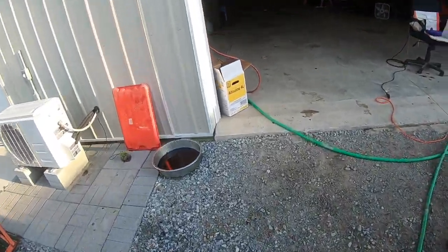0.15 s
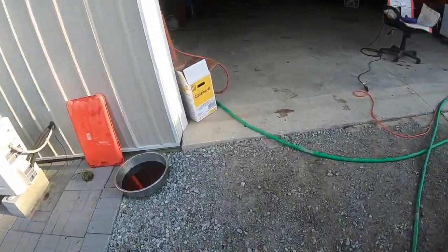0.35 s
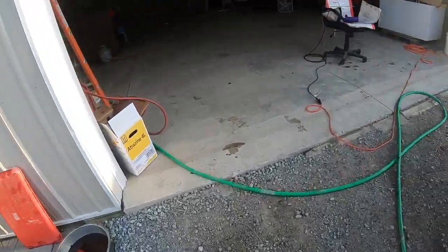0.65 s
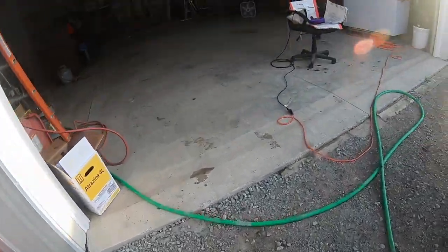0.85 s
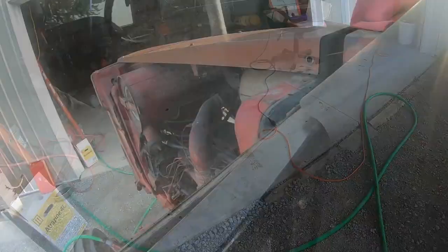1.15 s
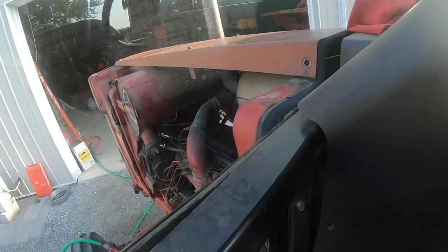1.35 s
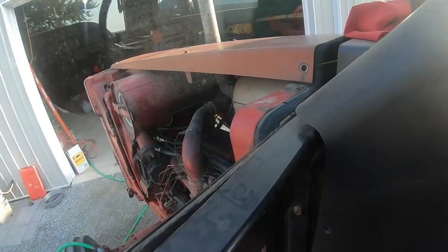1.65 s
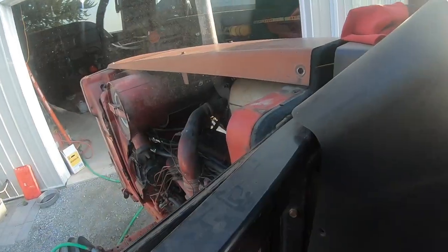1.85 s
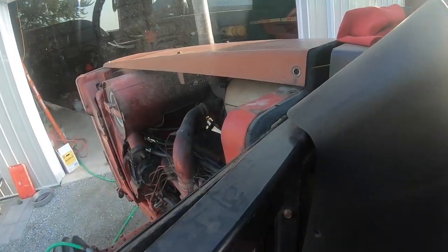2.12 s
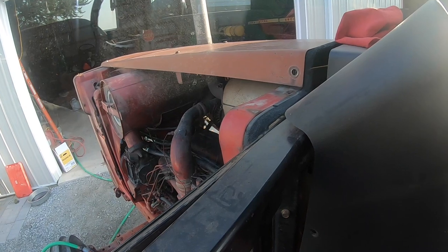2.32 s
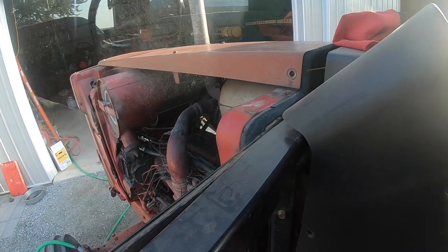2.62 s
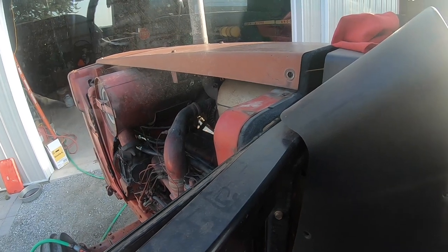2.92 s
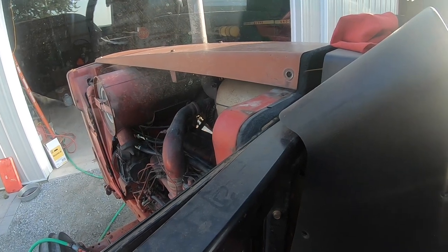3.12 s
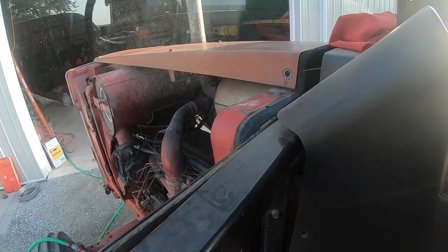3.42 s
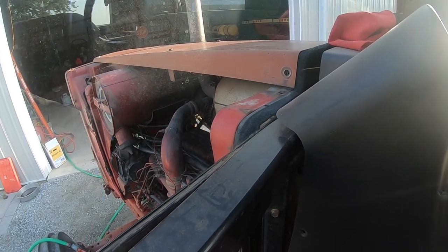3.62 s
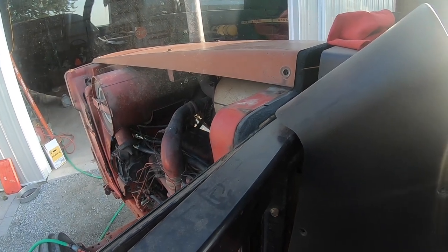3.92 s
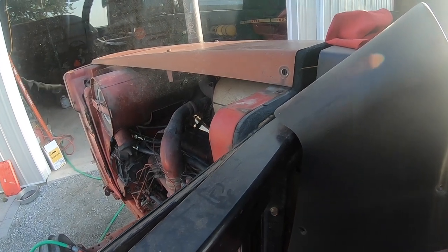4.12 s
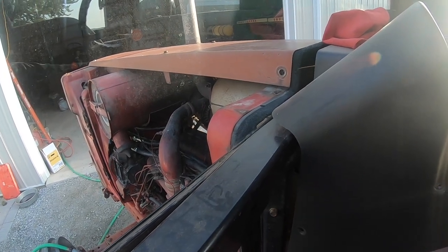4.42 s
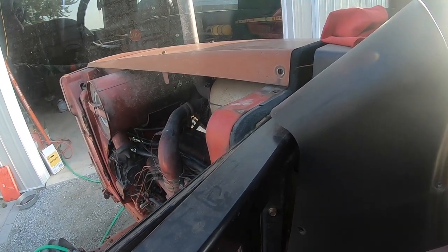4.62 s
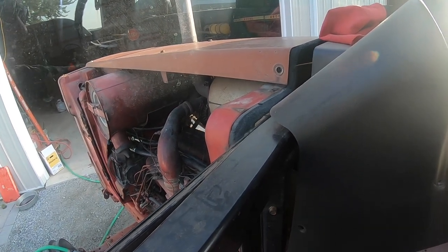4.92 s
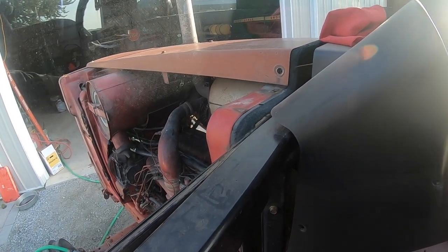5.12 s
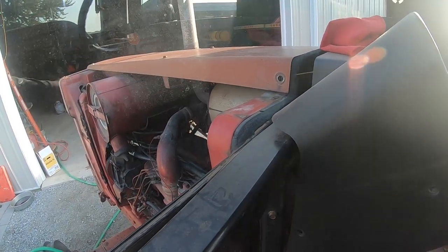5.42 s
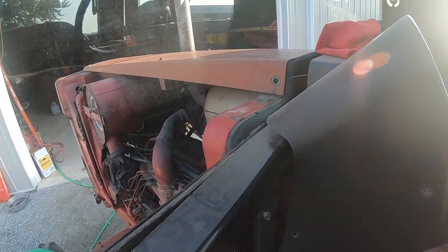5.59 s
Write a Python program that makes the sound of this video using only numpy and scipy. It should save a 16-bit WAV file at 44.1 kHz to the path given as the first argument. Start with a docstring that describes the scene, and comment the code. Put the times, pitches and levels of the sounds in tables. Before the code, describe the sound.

Heard through a small stereo microphone: brief footsteps on loose gravel with low handling thumps, fading into the near-quiet of a tractor cab. A sharp knock, hollow taps and small trim creaks follow over a thin fan hiss. A heavy starter clunk and grinding crank then break in, wide and rattly, before the diesel fires and runs in a low, centred, uneven idle that rises a little.

```python
"""Footsteps crunch on gravel in a yard, which dissolves into the cab of a six-cylinder diesel tractor.
The cab knocks and creaks, the starter clunks in and cranks, the engine catches and idles, and the
idle speed lifts a little near the end. Noise and random clicks are filtered into air, gravel, trim,
gear teeth and engine body; fading sine waves make stones, bumps and hollow knocks. A running count
of firings paces the engine. A small microphone with two openings (ports) hears it all in stereo."""
import sys
import numpy as np
from scipy import signal
from scipy.io import wavfile
from scipy.ndimage import uniform_filter1d

SR = 44100
rng = np.random.default_rng(int(sys.argv[2]) if len(sys.argv) > 2 else 0)


def persist_wave(psi):
    """Save psi, clipped to +-1, as 16-bit WAV."""
    counts = np.round(np.clip(psi, -1, 1) * 32767).astype(np.int16)
    wavfile.write(sys.argv[1], SR, np.atleast_2d(counts).T)


N = 253575  # length in samples

# In spectrum tables, level/dB is the density per Hz; only the shape counts where the result is evened.
# hiss of the cab fan, also used to colour the chirps: [f/Hz, level/dB]
FAN_SPECTRUM = [(1650, -49), (2800, -12), (3330, -9), (3380, -2), (3540, 6.5), (5000, 5.5), (5680, 4),
                (6190, -3), (6850, -18), (8900, -36), (15100, -120)]
DISSOLVE_S = (0.83, 1.246)  # the yard air sinks while the cab fan fades in
CAB_S = (1, 2.565)  # span of the cab's own sounds


def amp(db):
    """Turn decibels into a plain gain."""
    return 10 ** (np.asarray(db) / 20)


def evened(x):
    """Scale a sound to rms 1."""
    return x / np.sqrt(np.mean(x ** 2) + 1e-20)


def curves(rows):
    """Columns of a table, joined by straight lines over the whole length."""
    s, *columns = np.transpose(rows)
    return [np.interp(np.arange(N) / SR, s, c) for c in columns]


def ramp(span):
    """0 before a span, rising through it, 1 after it."""
    return np.interp(np.arange(N) / SR, span, [0, 1])


def during(t0, t1, fade):
    """1 inside a span, with fades just outside its ends."""
    return ramp([t0 - fade, t0]) - ramp([t1, t1 + fade])


def swells(rows):
    """Gain of events that each rise to a peak and die away; overlaps add as power."""
    t = np.arange(0, N + 44, 44) / SR  # a coarse clock is enough
    power = 0
    for s, db, rise, fall in rows:
        fading = np.where(t < s, ((s - t) / rise) ** 2, (t - s) / fall)
        power = power + amp(2 * db) * np.exp(-2 * fading)
    return np.interp(np.arange(N) / SR, t, np.sqrt(power))


def wander(size):
    """Slow chance at rms 1, smoothed twice over the given number of samples."""
    once = uniform_filter1d(rng.standard_normal(N), int(size))
    return evened(uniform_filter1d(once, int(size)))


def colour(x, points, size=8192):
    """Filter a sound to the given spectrum in dB, with no sound ahead of its cause."""
    f, db = np.transpose(points)
    bins_hz = abs(np.fft.fftfreq(size, 1 / SR))
    log_gain = np.interp(np.log(bins_hz + 1), np.log(f + 1), db) * np.log(10) / 20
    # the Hilbert transform gives the phase that makes the filter causal
    response = np.exp(np.conj(signal.hilbert(log_gain)))
    taps = np.fft.ifft(response).real[:size // 2] * np.hanning(size)[size // 2:]
    taps = taps.reshape((1,) * (x.ndim - 1) + (-1,))
    return signal.oaconvolve(x, taps, axes=-1)[..., :x.shape[-1]]


def resonate(x, hz, width):
    """One-pole resonance; a moving one shifts hz down to zero, smooths, and shifts back."""
    r = np.exp(-np.pi * width / SR)
    if np.isscalar(hz):
        return 2 * signal.lfilter([1 - r], [1, -r * np.exp(2j * np.pi * hz / SR)], x).real
    turn = np.exp(2j * np.pi * np.cumsum(hz) / SR)
    return 2 * (turn * signal.lfilter([1 - r], [1, -r], x / turn)).real


def narrow(x, hz, width):
    """A resonance applied twice, with steep flanks, at rms 1."""
    if np.isscalar(hz):
        pole = np.exp((2j * hz - width) * np.pi / SR)
        return evened(signal.lfilter([1], np.poly([pole, pole]), x).real)
    return evened(resonate(resonate(x, hz, width), hz, width))


def grains(per_s, spread_db, channels=1):
    """Random clicks of random sign; a few are large."""
    draw = rng.random((3, channels, N))
    size = amp(spread_db * np.minimum(-np.log(1 - draw[0]), 5))
    return size * np.sign(draw[1] - .5) * (draw[2] < per_s / SR)


def add(mix, s, sound):
    """Add a sound to the mix at s seconds, cut off at the end."""
    part = mix[..., round(s * SR):][..., :sound.shape[-1]]
    part += sound[..., :part.shape[-1]]


def ring(hz, t60, length=.25):
    """A sine that dies away by 60 dB in t60 seconds."""
    t = np.arange(round(length * SR)) / SR
    return np.sin(2 * np.pi * hz * t) * amp(-60 * t / t60)


def engine():
    """Uneven firings thud in the exhaust and gate the roar of the block and the valve clatter."""
    # engine load: [t/s, block roar level/dB]
    load = [(2.55, -51), (2.61, -28.5), (2.73, -33), (2.84, -39), (2.94, -32.5), (3.07, -35.5),
            (3.249, -30), (3.42, -28), (3.52, -31.5), (3.76, -32.5), (4.089, -39), (4.22, -34),
            (4.701, -34.5), (4.78, -31.5), (4.83, -35), (5.0, -31), (5.1, -34.5), (5.75, -34)]
    # running engine: [t/s, firings per second/Hz, exhaust tone level/dB, its fifth multiple level/dB]
    running = [(3.3, 33, -30, -60), (3.407, 35.1, -21.5, -48), (3.431, 33.2, -32, -37),
               (3.478, 33, -13, -22), (3.52, 33, -30, -31.5), (3.58, 35, -25, -28),
               (3.63, 35.6, -27, -28.5), (3.74, 36.2, -25, -23), (3.8, 35.7, -28, -26.5),
               (4.079, 34.5, -32, -27.5), (4.19, 34.8, -29.5, -41), (4.229, 35.3, -24, -28.5),
               (4.33, 34.8, -27, -33.5), (4.418, 36.3, -27.5, -26), (4.57, 36.3, -22.5, -36.5),
               (4.72, 34.8, -30, -36.5), (4.92, 36.4, -37, -32), (4.97, 38, -40, -39),
               (5.03, 40.8, -25, -33.5), (5.119, 41.8, -33, -40), (5.238, 41, -27, -36),
               (5.39, 40.6, -47, -31.5), (5.45, 40.2, -28, -34.5), (5.52, 40, -43, -32),
               (5.6, 40.8, -31, -31.5), (5.64, 37.8, -38, -39), (5.68, 35.8, -42, -27),
               (5.75, 40.6, -23, -41)]
    # strength of each of the six firings: [level/dB]
    cylinder_db = [-8, -0.5, -4.5, -3.5, -7, -2.5]
    # colour of exhaust, block, growl, valve clatter and sizzle: [f/Hz, level/dB]
    exhaust_spectrum = [(15, -23.5), (28, -11.5), (40, 2), (50, 10.5), (56, 6), (65, -3.5), (90, -4),
                        (150, -10.5), (300, -79.5)]
    block_spectrum = [(41, -22.5), (70, -12.5), (113, -4.5), (178, -3), (190, 4), (242, -10.5), (339, -6),
                      (375, -8), (429, -4.5), (482, -8), (520, -12), (680, -43.5), (1140, -120)]
    growl_spectrum = [(310, -20), (520, -6.5), (596, -4), (673, 6), (730, -0.5), (906, -5), (1000, -9.5),
                      (1300, -39.5), (2200, -120)]
    clatter_spectrum = [(590, -26.5), (1000, 0), (1220, -3.5), (1350, 0.5), (1510, -3.5), (1730, -2.5),
                        (2150, -9), (2500, -11), (2800, -15), (3110, -17), (3700, -13.5), (5130, -13),
                        (5290, -13.5), (5600, -14), (5780, -20), (6850, -39), (8900, -53.5), (15100, -120)]
    sizzle_spectrum = [(5500, -25.5), (6500, -1.5), (7000, -15), (7800, -0.5), (8600, -3.5), (9600, -9.5),
                       (10800, -17.5), (12000, -42.5), (15000, -68)]
    # sheet metal of bonnet and cab: [f/Hz, width/Hz, level against the layer around it/dB]
    sheet = [(144.16, 6.9, -9), (212.2, 19.7, -11), (297.6, 28, -7), (348.3, 8.6, -7), (420.3, 9.2, -13.5),
             (443.2, 14, -14), (515.6, 28, -18.5), (566, 21, -5), (647.8, 38, -2.5), (685.2, 14, -5),
             (1153.5, 23, -11.5), (1322, 35, -17.5), (1778, 37, -15.5), (2965, 27, -27.5)]
    # further engine tones: [multiple of the firing rate, level against the roar/dB]
    orders = [(1.5, -3.5), (2, -9.5), (4, -6.5), (4.5, -8.5), (6, -14), (8, -11.5), (9, -15), (11, -10.5)]
    # low thudding surges as the starter bites and the engine meets compression, catches and runs:
    # [peak t/s, level/dB, rise/s, fall/s]
    surges = [(2.66, -26, 0.02, 0.042), (2.75, -28.5, 0.014, 0.033), (3.3, -35, 0.19, 0.082),
              (3.39, -21, 0.03, 0.035), (3.48, -27, 0.032, .03), (4.1, -34, 0.11, 0.094),
              (4.6, -36.5, 0.15, 0.059), (5.04, -33, 0.034, 0.061)]
    # upper layers flare as starter meshes and engine catches: [peak t/s, level over idle/dB, rise/s, fall/s]
    flares = [(2.6, 3.5, 0.019, 0.018), (2.665, -5, 0.0044, 0.031), (2.755, -6, 0.017, 0.037),
              (2.985, -16, 0.0032, 0.08), (3.121, -13, 0.006, 0.026), (3.185, -7, 0.0067, 0.038),
              (3.262, -1, 0.0043, 0.085), (3.357, 3, 0.03, 0.063)]
    # growl swells and hard firings as the idle lifts: [peak t/s, level over idle/dB, rise/s, fall/s]
    rev = [(4.835, 3, 0.013, 0.03), (4.99, 6, 0.04, 0.04), (5.04, 4, .02, .04), (5.087, 5, .002, .012),
           (5.14, 1, 0.015, 0.029), (5.275, 5, .002, 0.014)]
    thud_db, growl_db, clatter_db, sizzle_db = -46, -46.5, -43.5, -76  # at a cold idle
    # growl, clatter and sizzle open up as the idle warms
    warm_s, growl_warm_db, clatter_warm_db, sizzle_warm_db = (3.8, 5.04), 7, 2.5, 4
    sizzle_flare_db = 12.5
    cranking_db, caught_s = -6, (2.99, 3.04)  # these layers are weaker until the engine fires
    whistle_hz, whistle_waver_hz, whistle_db, whistle_warm_db = 5450, 14.4, -60, 5  # intake whistle
    sheet_wander_db, sheet_wander_share = 1.8, .005  # the rings swell and drift a little in pitch
    lope_db, speed_waver = 2.5, .002  # exhaust tone lopes; share by which the speed wavers
    flutter_db, flutter_s = 2.5, (4.15, 4.95)  # the fifth multiple flutters

    roar, warm, flare = amp(curves(load)[0]), ramp(warm_s), swells(flares)
    steady = amp(cranking_db * (1 - ramp(caught_s)))
    growl = amp(growl_db) * (steady * amp(growl_warm_db * warm) + flare + swells(rev))
    clatter = amp(clatter_db) * (steady * amp(clatter_warm_db * warm) + flare)
    sizzle = amp(sizzle_db) * (steady * amp(sizzle_warm_db * warm) + amp(sizzle_flare_db) * flare)

    # the whole part counts firings, the fraction is the progress towards the next one
    speed, tone_db, fifth_db = curves(running)
    firings = np.cumsum(speed * (1 + speed_waver * wander(2500))) / SR
    count = firings.astype(int)
    chance_db = 1.95 * rng.standard_normal(N // 500)[count]
    strength = amp(np.take(cylinder_db, count % 6) + chance_db)
    pulses = evened(strength * np.diff(count, prepend=0))
    thud = evened(colour(ramp(caught_s) * pulses + 2.5 * rng.standard_normal(N), exhaust_spectrum))

    # each firing opens the noise sharply, then it dies down
    gate = 1.07 + strength * np.exp(-(firings % 1) / .35)
    shaken = 0.35 * pulses + evened(gate * rng.standard_normal(N))
    shaken = signal.lfilter(*signal.butter(4, 4000, fs=SR), shaken)  # heavy iron takes up little treble
    taps = (0.19 + gate) * (rng.standard_normal(N) + 0.44 * evened(grains(1700, 3.9)[0]))
    out = (amp(thud_db) + swells(surges)) * thud
    out += sizzle * evened(colour(taps, sizzle_spectrum))
    out += roar * evened(colour(shaken, block_spectrum))
    out += growl * evened(colour(shaken, growl_spectrum))
    out += clatter * evened(colour(taps, clatter_spectrum))
    for hz, width, db in sheet:
        around = roar if hz < 550 else growl if hz < 1000 else clatter
        drift_hz = hz * (1 + sheet_wander_share * wander(11000))
        ring_gain = amp(db + sheet_wander_db * wander(5000))
        out += around * ring_gain * narrow(shaken, drift_hz, width)

    # once the engine has caught, its exhaust tones stand out clean
    tone_db = tone_db + lope_db * (wander(900) - 1)
    fifth_db = fifth_db + flutter_db * (wander(700) - 1) * during(*flutter_s, .05)
    hum = amp(tone_db) * np.sin(2 * np.pi * firings)
    hum += amp(fifth_db) * np.sin(2 * np.pi * 5 * firings)
    hum *= np.sqrt(2)
    for k, db in orders:
        hum += roar * amp(db) * np.sin(2 * np.pi * (k * firings + rng.random()))
    hum *= amp(1.2 * wander(1800))  # the level of the tones is uneven
    waver = whistle_waver_hz * evened(uniform_filter1d(rng.standard_normal(N), 1500))
    whistle = np.sin(2 * np.pi * np.cumsum(whistle_hz + waver) / SR)
    whistle += 0.5 * narrow(rng.standard_normal(N), whistle_hz, 120)
    tones = hum + amp(whistle_db + whistle_warm_db * warm) * whistle
    first_tone = running[0][0]
    return out * ramp([load[0][0], load[1][0]]) + tones * ramp([first_tone - .11, first_tone])


def starter():
    """Gear teeth scrape in uneven grains; the motor groans under load in gliding tones."""
    # starter gear grinding on the flywheel: [t/s, level/dB]
    crank = [(2.561, -55.5), (2.62, -45.5), (2.7, -64.5), (2.82, -50), (2.94, -65), (3.1, -44.5),
             (3.2, -48.5), (3.371, -37), (3.449, -54)]
    # colour of the grinding: [f/Hz, level/dB]
    grind_spectrum = [(530, -29), (900, 7.5), (1220, -16.5), (2330, 1.5), (2690, -15), (2960, 2.5),
                      (3190, -17), (3810, -8), (5450, -10.5), (6850, -21.5), (8900, -71), (15100, -120)]
    # groans as it bites and meets each compression: [t/s, length/s, start f/Hz, end f/Hz, level/dB]
    groans = [(2.595, 0.099, 240, 95, -23), (2.599, 0.036, 403, 454, -32), (2.645, 0.032, 292, 350, -27.5),
              (2.672, 0.07, 170, 189, -29.5), (2.698, 0.061, 87, 59.3, -32.5),
              (2.724, 0.047, 200, 217, -23.5), (2.729, 0.11, 414, 464, -36), (2.79, 0.054, 171, 223, -31),
              (2.866, 0.044, 210, 223, -29), (2.895, 0.05, 188, 169, -31), (2.93, 0.043, 172, 160, -32.5)]
    out = amp(curves(crank)[0]) * evened(colour(grains(500, 1.5)[0], grind_spectrum))
    out *= during(crank[0][0], crank[-1][0], 0.0043)
    for s, length, start_hz, end_hz, db in groans:
        hz = np.linspace(start_hz, end_hz, round(length * SR))
        groan = evened(np.sin(2 * np.pi * np.cumsum(hz) / SR))
        add(out, s, amp(db) * groan * np.hanning(len(hz)))
    return out


def knocks():
    """Each knock is a burst of rattling trim over the hollow ring of the cab; metal parts squeal."""
    # knocks on the cab: [t/s, rattle level/dB, rattle length/s, rattle top f/Hz, hollow ring level/dB]
    blows = [(1.0726, -65, 0.02, 1500, -27), (1.206, -37.5, 0.028, 8800, -75),
             (1.313, -53.5, 0.015, 4500, -62.5), (1.39, -71, 0.023, 3500, -47),
             (1.449, -71, 0.029, 3300, -51), (1.709, -55, 0.038, 3280, -55),
             (1.833, -56.5, 0.019, 3260, -47), (1.909, -62, .03, 3300, -65), (1.949, -61, 0.062, 3300, -60),
             (2.008, -58.5, 0.035, 3300, -57), (2.131, -60, 0.027, 3300, -62),
             (2.222, -64, 0.062, 3320, -59), (2.49, -56, 0.021, 3960, -52),
             (2.569, -46.5, 0.044, 5200, -54), (2.596, -40, 0.026, 14000, -37),
             (2.658, -45, 0.018, 10000, -43), (2.752, -56, 0.03, 9200, -39)]
    # tones of the hollow cab: [f/Hz, level/dB, time to fall 60 dB/s]
    hollow_tones = [(192, 0, .11), (370, -11, .07), (594, -2, .065), (700, -9, .05), (874, -6, .05),
                    (1230, -22, .15)]
    # colour of the rattling trim: [f/Hz, level/dB]
    rattle_spectrum = [(150, -29), (250, -21), (450, -10), (1070, -15.5), (1340, -12), (2600, -15),
                       (3380, -18.5), (3830, -14), (5600, -21), (6850, -32), (8900, -56), (11000, -48),
                       (14500, -38), (16000, -93)]
    # rings of shaken parts, squeaks, passing rattles: [t/s, length/s, f/Hz, width/Hz, level/dB]
    squeals = [(0.069, 0.048, 3470, 240, -62.5), (2.593, 0.042, 3830, 130, -53),
               (2.606, 0.04, 5700, 160, -58), (2.598, 0.041, 3070, 100, -44.5),
               (2.727, 0.061, 4690, 520, -44), (2.75, 0.05, 1690, 90, -52), (2.777, 0.066, 1335, 75, -47),
               (2.799, 0.065, 2500, 100, -52), (2.811, 0.048, 2200, 100, -54),
               (2.812, 0.09, 1332, 65, -47.5), (2.901, 0.036, 980, 160, -42.5),
               (2.74, .04, 13600, 900, -76), (1.39, 0.052, 13500, 200, -76), (1.2, .07, 13500, 200, -93),
               (2.927, 0.054, 4240, 450, -53), (2.987, 0.047, 1750, 95, -49),
               (3.053, 0.066, 1744, 87, -47.5), (3.063, 0.33, 3870, 450, -51.5),
               (3.098, 0.12, 2450, 130, -51), (3.16, 0.071, 2980, 110, -51), (3.209, 0.054, 2700, 110, -59),
               (3.297, 0.074, 3000, 120, -48.5), (3.27, .07, 1340, 101, -45),
               (3.35, 0.069, 1346, 150, -38.5), (1.411, 0.2, 3490, 60, -67), (2.2, .11, 3500, 60, -70),
               (1.42, .09, 4740, 70, -65), (4.058, 0.25, 1370, 90, -57.5), (4.36, 0.2, 1136, 80.1, -50),
               (4.501, 0.15, 1780, 110.2, -47), (4.88, .12, 1770, 120, -45.5),
               (5.25, 0.47, 1315, 70.03, -50), (5.352, 0.34, 1664, 100.1, -52.5)]
    out, t = np.zeros(N), np.arange(SR // 4) / SR
    hollow = sum(amp(db) * ring(hz, t60) for hz, db, t60 in hollow_tones)
    hollow *= np.minimum(t / .0025, 1)  # a padded blow
    for s, db, length, top_hz, ring_db in blows:
        low_pass = signal.butter(4, min(top_hz, 20000), fs=SR)
        noise = signal.lfilter(*low_pass, rng.standard_normal(len(t)))
        rattle = evened(colour(noise, rattle_spectrum))
        add(out, s, amp(db) * rattle * np.exp(-(t / length) ** 2) * np.minimum(t / 0.003, 1))
        add(out, s, amp(ring_db) * hollow)
    for s, length, hz, width, db in squeals:
        squeal = narrow(rng.standard_normal(round(length * SR)), hz, width)
        pure = evened(np.sin(2 * np.pi * hz * np.arange(len(squeal)) / SR))
        squeal += .4 * pure
        add(out, s, amp(db) * squeal * np.hanning(len(squeal)))
    return out


def cab():
    """Small shifts of weight jolt the panels into a drone; trim creaks; a fan hisses and whirrs."""
    # resonances of the panels: [f/Hz, width/Hz, level/dB]
    panels = [(155.8, 42, 4), (193.2, 30.6, 1.5), (321, 43, -29), (80, 20, -10.5), (38.3, 24, -6)]
    # colour of the creaking: [f/Hz, level/dB]
    creak_spectrum = [(180, -26.5), (300, -1), (434, -19.5), (556, -14.5), (1110, -28), (1700, -24.5),
                      (3330, -41.5), (4000, -29), (5200, -59), (8800, -120)]
    # shifts of weight that set the panels droning: [peak t/s, level/dB, rise/s, fall/s]
    shifts = [(1.06, -35, 0.014, 0.041), (1.5, -52.5, 0.23, 0.54), (1.74, -38.5, 0.032, 0.068),
              (1.86, -44.5, 0.019, 0.89), (2.23, -41.5, 0.028, 0.068), (2.55, -43, 0.044, .04),
              (2.62, -39, 0.011, 0.057)]
    # creaks of the trim: [peak t/s, level/dB, rise/s, fall/s]
    creaks = [(1.06, -53, 0.047, 0.032), (1.25, -42, 0.03, 0.013), (1.5, -49.5, 0.21, 0.23),
              (1.836, -50.5, 0.0065, 0.17), (2.17, -50, 0.03, 0.018), (2.24, -49.5, 0.037, 0.038),
              (2.37, -56, 0.043, 0.063), (2.516, -48, 0.022, 0.026), (2.6, -41, 0.027, .05)]
    drone_floor_db, creak_floor_db, fan_db, chirp_db = -69.5, -71, -68, -74
    # a whirr in the hiss dips in pitch at regular times
    whirr_hz, whirr_dip_hz, whirr_db = 5300, 1252, -68
    first_dip_s, dip_every_s, dip_length_s = 1.56, 0.75, 0.1

    jolts = grains(300, 3.7)[0]
    drone = sum(amp(db) * resonate(resonate(jolts, hz, w), hz, w) for hz, w, db in panels)
    drone = evened(drone)
    creak = evened(colour(grains(4000, 2.4)[0], creak_spectrum))
    fan = amp(fan_db) * evened(colour(rng.standard_normal(N), FAN_SPECTRUM))
    turns = (np.arange(N) / SR - first_dip_s) / dip_every_s
    from_dip_s = abs(turns - np.round(turns)) * dip_every_s  # time to the nearest dip
    moving_hz = whirr_hz - whirr_dip_hz * np.exp(-from_dip_s / dip_length_s)
    fan += amp(whirr_db) * narrow(rng.standard_normal(N), moving_hz, 950)
    fan += amp(chirp_db) * chirps(moving_hz)
    trim = (amp(drone_floor_db) + swells(shifts)) * drone
    trim += (amp(creak_floor_db) + swells(creaks)) * creak
    return (trim + ramp(DISSOLVE_S) * fan) * during(*CAB_S, 0.11)


def chirps(centre_hz):
    """Brief thin tones whose pitch is scattered about a moving centre."""
    per_s, scatter_hz, length_s = 400, 420, .06
    out, t = np.zeros(N), np.arange(round(length_s * SR)) / SR
    start = np.arange(CAB_S[0], CAB_S[1], 1 / per_s)
    for s, (size, off, phase) in zip(start, rng.standard_normal((len(start), 3))):
        hz = centre_hz[round(s * SR)] + scatter_hz * off
        add(out, s, amp(2.5 * size) * np.sin(2 * np.pi * (hz * t + phase)) * np.hanning(len(t)))
    return evened(colour(out, FAN_SPECTRUM))


def yard():
    """Open air, insects, gravel and rumble, unrelated at the two microphone ports."""
    # colour of the open air, the gravel and the rumble: [f/Hz, level/dB]
    air_spectrum = [(35, -39), (60, -21), (97, -8), (175, 1.5), (481, -24), (575, -30), (635, -16),
                    (1020, -26), (1460, -21), (1680, -25.5), (2400, -30.5), (6850, -33.5), (8900, -45.5),
                    (10000, -49.5), (13500, -55), (15100, -99)]
    gravel_spectrum = [(120, -21), (200, -3), (321, -10.5), (662, -8.5), (917, -17.5), (1020, -11),
                       (1540, -14), (1950, -14.5), (2860, -20.5), (6850, -28.5), (8900, -41), (15100, -120)]
    rumble_spectrum = [(8.8, -40), (15, -1), (46, 10), (97, -16), (162, -2), (295, -25), (390, -15.5),
                       (500, -38), (650, -77), (1100, -120)]
    # balance of the yard: [f/Hz, left minus right/dB]
    pan = [(60, -6), (190, -2.5), (620, -3), (1990, -3), (6400, -2.5)]
    # insects: [f/Hz, width/Hz, level against the air/dB]
    insects = [(7160, 120, -22.5), (7570, 600, -24.5)]
    # gravel crunching under the feet: [peak t/s, level/dB, rise/s, fall/s]
    crunches = [(.114, -53, 0.021, 0.007), (.25, -58, 0.03, 0.039), (.338, -39.5, 0.018, 0.066),
                (.46, -45, 0.082, 0.048), (.94, -41, 0.019, 0.03), (1.034, -52, 0.024, 0.051),
                (1.162, -55.5, 0.021, 0.017)]
    # gusts of wind and handling rumble: [peak t/s, level/dB, rise/s, fall/s]
    gusts = [(.1, -52, 0.045, .015), (.194, -39.5, 0.016, 0.026), (.48, -29.5, 0.066, 0.037),
             (.89, -58, 0.15, 0.017), (1.06, -37.5, 0.029, 0.025), (1.186, -40, 0.048, 0.033)]
    # stones snapping under the sole: [t/s, level/dB, f/Hz, left minus right/dB]
    stones = [(0.097, -39, 735, -4.5), (0.226, -40.5, 2000, -10), (0.274, -45, 837, -3.0),
              (0.298, -31, 1000, -7), (0.323, -32, 2060, -11), (0.3298, -25.5, 1870, -20),
              (0.331, -26, 800, -12), (0.337, -35, 2000, -12), (0.3442, -26.5, 1400, -11),
              (0.346, -32, 2300, -12), (0.353, -36, 1500, -10), (0.362, -37, 3330, -10),
              (0.38, -36, 703, -6.0), (0.387, -38, 1200, -8), (0.416, -34, 1700, -17),
              (0.45, -40, 1170, -13), (0.526, -37, 1564, -12), (0.699, -39, 1400, -5),
              (0.879, -46, 2150, -14), (0.921, -37, 1300, -12), (0.9265, -28, 1150, -10),
              (0.9403, -27.5, 1130, -18.5), (0.932, -39, 1600, -10), (0.95, -42, 2200, -7),
              (0.958, -33, 1130, -8), (0.966, -39, 1500, -10), (1.013, -42, 1240, -16),
              (1.0302, -32, 1250, -14), (1.033, -35, 600, -9), (1.0396, -31, 1100, -9)]
    # dull bumps on the microphone: [t/s, level/dB, f/Hz, time to fall 60 dB/s, left minus right/dB]
    bumps = [(0.185, -26, 141, 0.18, -5.5), (0.209, -26.5, 45, 0.099, -9), (0.4096, -22, 118, 0.092, -8.5),
             (0.432, -28, 34.7, 0.15, -17), (0.487, -19.5, 154, 0.068, -7), (0.511, -30, 45, 0.076, -15),
             (0.964, -34.5, 35, 0.24, -14)]
    air_db, air_fade_db, crunch_floor_db, rumble_db = -47.5, -13, -66.5, -53

    air = evened(colour(rng.standard_normal((2, N)), air_spectrum))
    for hz, width, db in insects:
        air += amp(db) * narrow(rng.standard_normal((2, N)), hz, width)
    air *= amp(air_db + air_fade_db * ramp(DISSOLVE_S))
    crunch = evened(colour(grains(1800, 3.2, channels=2), gravel_spectrum))
    crunch *= amp(crunch_floor_db) + swells(crunches)
    rumble = evened(colour(rng.standard_normal((2, N)), rumble_spectrum))
    rumble *= amp(rumble_db) + swells(gusts)
    left, right = air + crunch + rumble
    out = np.array([colour(left, pan), right]) * during(0, DISSOLVE_S[1], 0.073)
    for s, db, hz, pan_db in stones:
        snap = -np.convolve(ring(hz, .006, .02), np.hanning(7) / 3)  # softened edge
        add(out[0], s + 0.00031, amp(db + pan_db / 2) * snap)  # the left port is further away
        add(out[1], s, amp(db - pan_db / 2) * snap)
    for s, db, hz, t60, pan_db in bumps:
        gain = amp(db + pan_db * np.array([[.5], [-.5]]))
        add(out, s, gain * [[-1], [1]] * ring(hz, t60))  # the ports are pushed opposite ways
    return out


def scene():
    """Mix the sources; the tractor sound widens around the cranking, then closes to the middle."""
    # width of the sound, the treble closing first: [t/s, bass side minus mid/dB, treble side minus mid/dB]
    spread = [(2.33, -17, -43), (2.45, -7, -15), (2.601, -1, -6), (2.8, -4, -9.5), (3, -1, -18),
              (3.2, -10.5, -31), (3.4, -22, -58), (3.75, -27, -55.5), (3.88, -47, -59)]
    # filters for the bass and the treble of the side sound: [f/Hz, gain/dB]
    wide_bass = [(30, -19), (100, -4.5), (200, 0), (450, 5), (600, 0), (1000, -20), (1500, -35)]
    wide_treble = [(500, -34), (900, 7.5), (2500, -7), (4000, -31), (6000, 11), (10000, 12)]
    mid = cab() + knocks() + starter() + engine()
    # a scattered copy of the tractor sound, opposite in sign left and right, widens it
    scatter = rng.standard_normal(1500) * np.exp(-np.arange(1500) / 350)
    scattered = signal.oaconvolve(mid, scatter / np.linalg.norm(scatter))[:N]
    bass_db, treble_db = curves(spread)
    side = amp(bass_db) * colour(scattered, wide_bass)
    side += amp(treble_db) * colour(scattered, wide_treble)
    side *= during(spread[0][0], spread[-1][0], .02)
    return yard() + np.array([mid + side, mid - side])


def record(dry):
    """Faint self-noise of the microphone, then the band limit."""
    edge_hz = 15000
    noisy = dry + amp(-112) * rng.standard_normal(dry.shape)
    low_pass = signal.firwin(511, edge_hz, window=("kaiser", 9), fs=SR)
    return signal.oaconvolve(noisy, low_pass[None], "same")


dry = scene()
out = record(dry)
persist_wave(out)
```